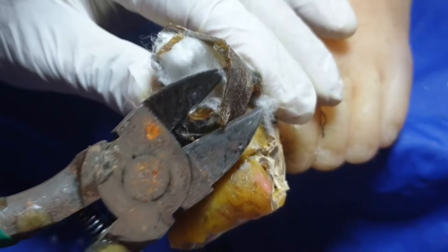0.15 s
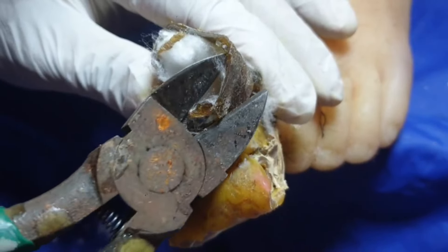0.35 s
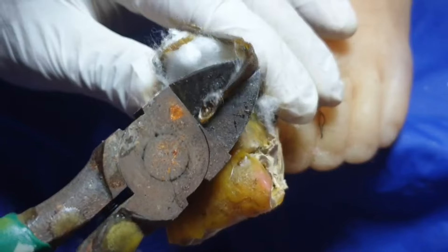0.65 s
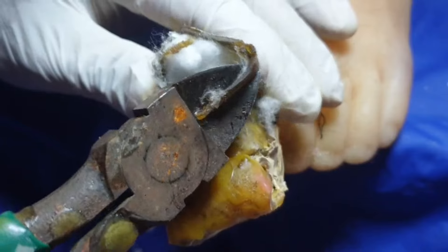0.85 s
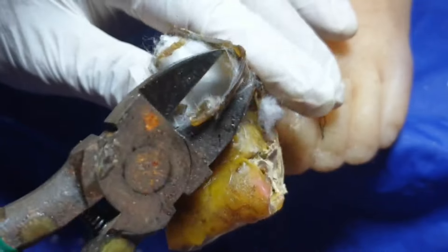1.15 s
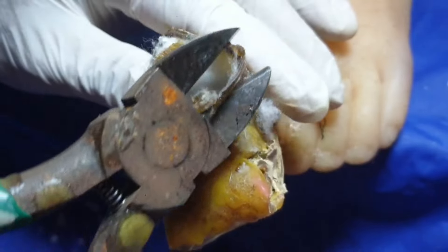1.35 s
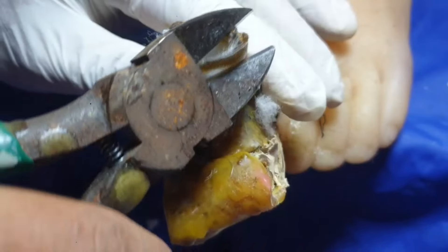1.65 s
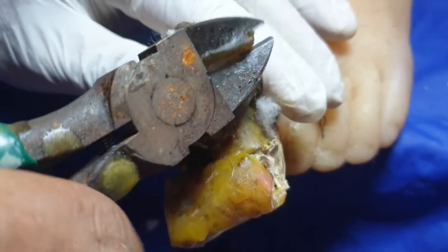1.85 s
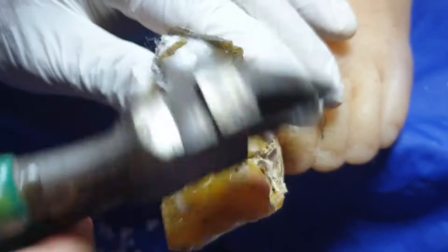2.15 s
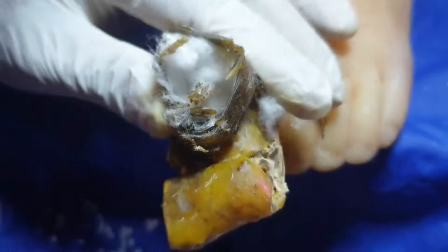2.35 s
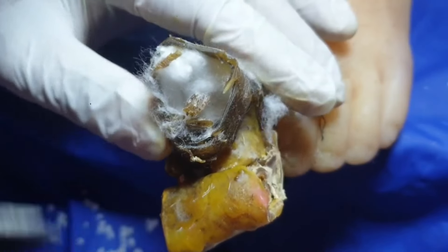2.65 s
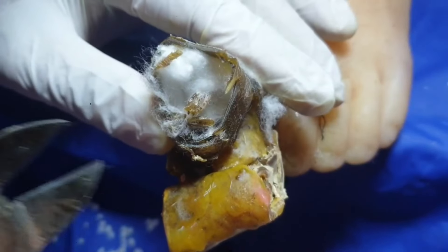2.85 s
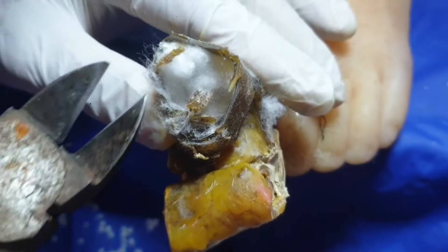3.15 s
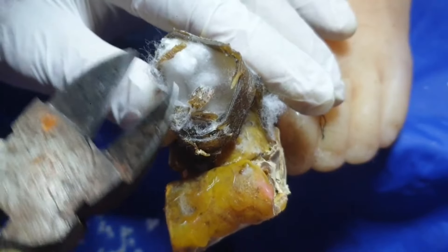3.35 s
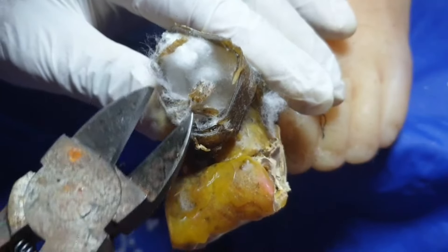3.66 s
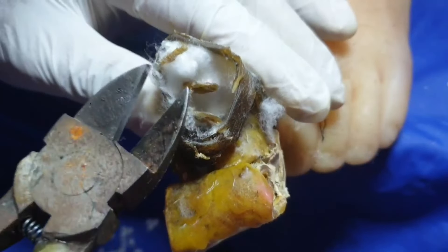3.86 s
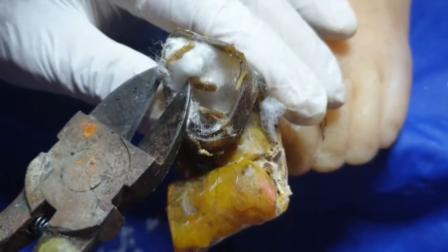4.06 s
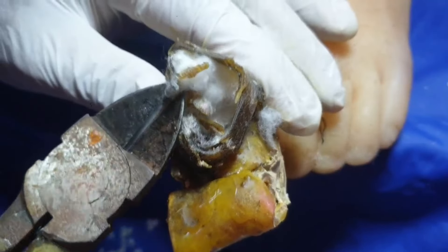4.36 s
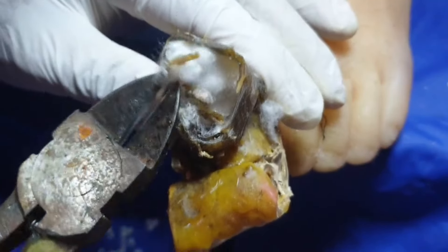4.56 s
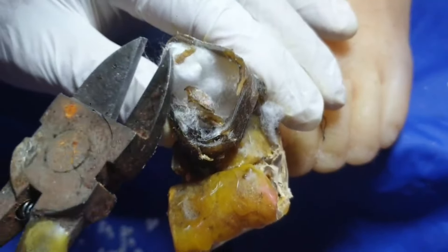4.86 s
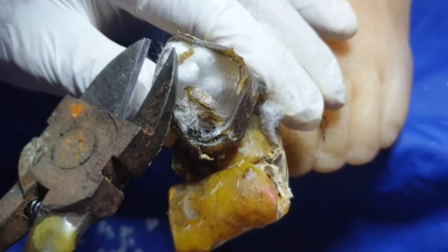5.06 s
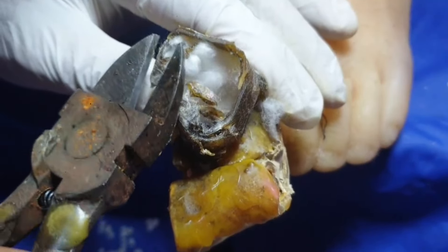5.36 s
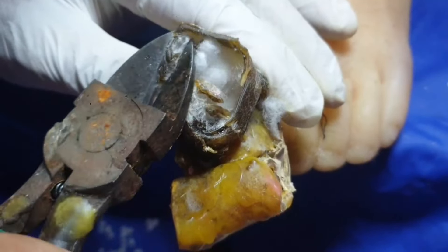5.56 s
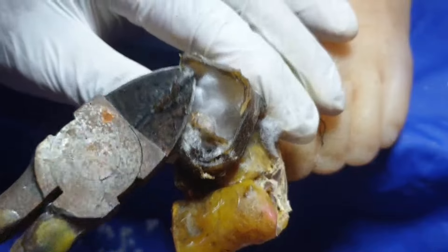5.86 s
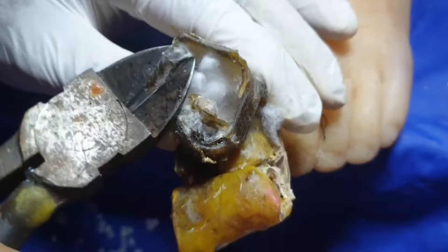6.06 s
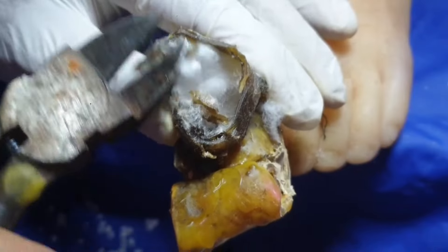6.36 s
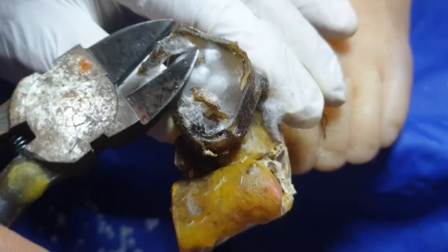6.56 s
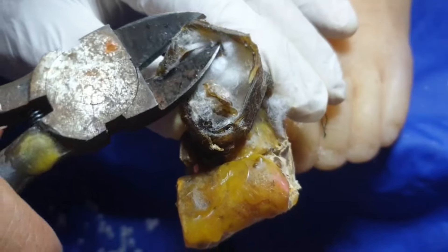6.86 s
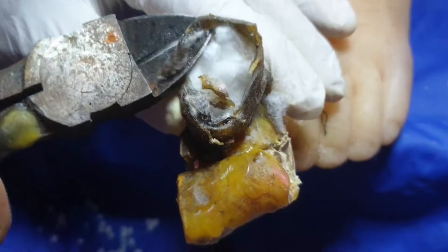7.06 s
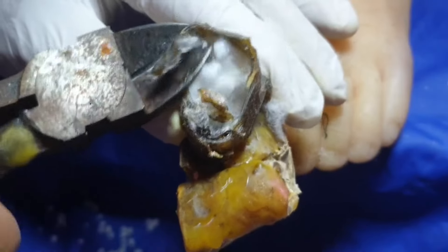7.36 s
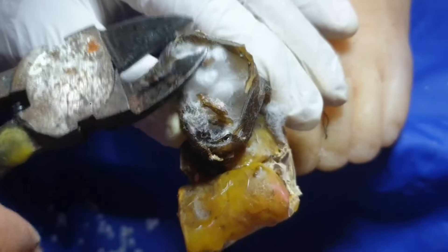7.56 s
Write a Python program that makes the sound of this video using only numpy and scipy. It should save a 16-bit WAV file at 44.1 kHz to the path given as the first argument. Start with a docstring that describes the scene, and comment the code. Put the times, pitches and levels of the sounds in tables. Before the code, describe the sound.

Heavy nippers rasp and squeak faintly, then cut a thick toenail with sharp snaps over a low fan hum and faint hiss.

```python
"""A small hard-walled room, where heavy sprung nippers trim a thick toenail close to the microphone.
A fan hums behind, under faint hiss, and a light draught buffets the two microphone ports.
Steel slips and sticks on steel, so the pivot rasps and squeaks as the jaws close and open.
The nail ticks under load, then parts with a sharp snap that briefly rings both nail and jaws.
Between bites the nippers bump and briefly rattle as they are moved."""
import sys
import numpy as np
from scipy import signal
from scipy.fft import rfft, irfft, next_fast_len
from scipy.io import wavfile
from scipy.ndimage import map_coordinates

SR = 44100
rng = np.random.default_rng(int(sys.argv[2]) if len(sys.argv) > 2 else 0)


def unload_audio(sound):
    """Save the sound as a 16-bit wav file, at the path given as the first command line argument."""
    columns = np.transpose(np.atleast_2d(sound))
    # keep every value between -1 and 1, then stretch to whole-number steps
    steps = np.round(np.clip(columns, -1, 1) * 32767)
    wavfile.write(sys.argv[1], SR, steps.astype(np.int16))


N = 339570
TIME = np.arange(N) / SR


def from_db(db):
    """Decibels to gain."""
    return 10 ** (np.asarray(db) / 20)


def unit_rms(x):
    """Scale to rms 1."""
    return x / np.sqrt(np.mean(x ** 2) + 1e-30)


def panned(pan_db):
    """Left and right gains of mean power 1; every pan is left minus right."""
    return unit_rms(from_db(np.array([[pan_db], [-pan_db]]) / 2))


def eq_curve(points, size):
    """Each column of a frequency table, read at the bins of an FFT of this size."""
    hz, *columns = np.transpose(points)
    log_bins = np.log(np.maximum(np.fft.rfftfreq(size, 1 / SR), 1))
    return np.array([np.interp(log_bins, np.log(hz), column) for column in columns])


def equalise(x, db):
    """Minimum-phase EQ with a gain for each FFT bin: nothing rings ahead of an attack."""
    size = 2 * (db.shape[-1] - 1)
    cepstrum = irfft(np.log(from_db(db)))
    cepstrum[..., 1:size // 2] *= 2
    cepstrum[..., size // 2 + 1:] = 0
    return irfft(rfft(x, size) * np.exp(rfft(cepstrum)))[..., :x.shape[-1]]


def noise(eq):
    """Two unrelated noises of the given colour; rms 1."""
    size = next_fast_len(N, True)
    white = rfft(rng.standard_normal((2, size)))
    return unit_rms(irfft(white * from_db(eq_curve(eq, size)), size)[:, :N])


def drift(rate):
    """Smooth random modulation, changing about rate times a second; rms 1."""
    knots = rng.standard_normal(int(N / SR * rate) + 4)
    return unit_rms(map_coordinates(knots, [TIME * rate], order=3, mode="nearest"))


def resonate(x, hz, width_hz):
    """One band-pass resonance; rms 1."""
    r = np.exp(-np.pi * width_hz / SR)
    poles = [1, -2 * r * np.cos(2 * np.pi * hz / SR), r * r]
    return unit_rms((1 - r * r) * signal.lfilter([1, 0, -1], poles, x))


def ring(t, hz, t60, rise):
    """A damped sine that swells briefly after t = 0."""
    t = np.maximum(t, 0)
    return np.sin(2 * np.pi * hz * t) * (1 - np.exp(-t / rise)) * np.exp(-np.log(1000) * t / t60)


def add(track, s, sound):
    """Mix a sound into the track at s seconds."""
    start = round(s * SR)
    sound, start = sound[:, max(-start, 0):], max(start, 0)
    track[:, start:start + sound.shape[-1]] += sound[:, :N - start]


# colour of the hiss: (frequency [Hz], left gain [dB], right gain [dB])
HISS_EQ = [(2036, -13.5, -5), (3950, 0, -3.5), (5000, -5.5, -1), (7300, -12.5, -4), (8240, -17.5, -14.5),
           (9800, -6.5, -15), (11400, -4, -2), (13300, -4.5, -6.5), (16000, -7.5, -7.5)]


def hiss(level_db=-74.5):
    """A faint, steady bed of bright noise."""
    return from_db(level_db) * noise(HISS_EQ)


# colour of the fan's air: (frequency [Hz], gain [dB])
FAN_EQ = [(20, -43), (35, -13.5), (60, -4), (120, -8), (170, -4), (300, -4), (540, -6), (800, -12.5),
          (1000, -9), (1400, -15), (1800, -16.5), (2750, -25), (3700, -42.5), (6000, -73)]
# its stereo width: (frequency [Hz], side minus mid [dB])
FAN_WIDTH = [(60, -12), (110, -14.5), (200, -14.5), (380, -7.5), (700, -4), (1290, 0.5), (2380, -1),
             (4400, 3), (8120, -2), (15000, -0.5)]
# its lean: (frequency [Hz], pan [dB])
FAN_PAN = [(60, -1), (110, 0), (200, -4), (380, 2), (700, 1.0), (1290, 1), (2380, -1), (4400, -11.5),
           (8120, -1), (15000, 0.5)]


def fan(air_db=-50.5, hum_hz=201.6, hum_db=-54.5, waver_db=1.0, wander_radians=0.18):
    """Dull moving air, nearly mono in the lows, with one slightly wavering blade tone."""
    size = next_fast_len(N, True)
    mid, side = rfft(from_db(air_db) * noise(FAN_EQ), size)
    side = side * from_db(eq_curve(FAN_WIDTH, size))
    polarity = np.array([[1], [-1]])
    balance = from_db(polarity * eq_curve(FAN_PAN, size) / 2)
    air = irfft((mid + polarity * side) * balance, size)[:, :N]
    hum = np.sqrt(2) * np.sin(2 * np.pi * hum_hz * TIME + wander_radians * drift(8))
    return air + from_db(hum_db + waver_db * drift(6.5)) * hum * panned(1.5)


# colour of the wind rumble: (frequency [Hz], gain [dB])
RUMBLE_EQ = [(15, -30.5), (30, -18.5), (55, 3), (85, -1.5), (130, -9.5), (200, -17.5), (400, -30.5),
             (900, -73.5)]
# gusts on the ports: (start [s], hold [s], level [dB], pan [dB])
DRAUGHT_GUSTS = [(0.16, 0.27, -41.5, -6), (0.50, 0.42, -49, -23), (0.80, 0.2, -42, -9),
                 (1.04, 0.24, -50, 4), (1.76, 0.39, -48.5, -1), (2.3, 0.36, -53.5, 3),
                 (2.64, 0.088, -44, -10), (3.27, 0.56, -59, 0.5), (4.63, .15, -47, -6.5),
                 (4.81, 0.22, -42, 4), (5.14, 0.19, -47.5, -9), (5.97, 0.7, -43.5, -13),
                 (7.3, 0.45, -51.5, -16)]
# single eddies: (time [s], level [dB], pitch [Hz], pan [dB])
EDDIES = [(0.90, -31, 90, -10), (1.148, -35, 78.4, 18), (2.195, -30.5, 74.6, -24), (3, -31, 129, -20),
          (4.817, -27.5, 69.6, 32), (5.158, -32.5, 74.4, -16), (5.624, -38.5, 86.5, 22),
          (6.05, -30, 70, -23), (6.325, -27.5, 273, -24), (6.334, -25, 125, -16), (6.354, -27, 74.3, -23),
          (7.606, -32, 78.6, -24)]


def draught(calm_db=-66, attack_s=.04, release_s=.099, lumpy_db=2.0):
    """Gusts build, hold and fade, rumbling on each port; the strongest eddies land as soft thumps."""
    power = from_db(calm_db) ** 2
    for s, hold_s, db, pan_db in DRAUGHT_GUSTS:
        gust = np.exp(np.minimum(TIME - s, 0) / attack_s - np.maximum(TIME - s - hold_s, 0) / release_s)
        power = power + (from_db(db) * panned(pan_db) * gust) ** 2
    wind = noise(RUMBLE_EQ) * np.sqrt(power) * from_db(lumpy_db * drift(25))
    for s, db, hz, pan_db in EDDIES:
        cycles = np.arange(-1, 1, hz / SR)
        thump = np.sin(2 * np.pi * cycles) * np.exp(-(cycles / .5) ** 2)
        add(wind, s - 1 / hz, from_db(db) * thump * panned(pan_db))
    return wind


# colour of the reverb: (frequency [Hz], left gain [dB], right gain [dB])
ROOM_EQ = [(498.6, -1, -3.5), (2000, 6.5, 2), (3400, 3.5, 6), (4210, 3.5, 6.5), (5050, 2, 6.5),
           (6500, -8, 0), (7280, -2.5, 6.5), (8080, 3, 0), (9460, -2, -4.5), (11000, -2.5, -2.5),
           (13370, 4.5, 2.5)]
# its decay by band: (frequency [Hz], t60 [s])
ROOM_DECAY = [(510, 0.55), (2010, 0.29), (4010, 0.82), (7010, .74), (11010, 0.55), (15900, 0.44)]


def room(send, size=2 ** 15, wet_db=-14.5, first_wall_s=0.0033):
    """Hard walls return a diffuse tail that builds after the first wall and lingers most near 4 kHz."""
    t = np.arange(size) / SR
    white, tail = rfft(rng.standard_normal((2, size))), 0
    centres = [hz for hz, _ in ROOM_DECAY]
    for share, (_, t60) in zip(np.eye(len(centres)), ROOM_DECAY):
        band = irfft(white * eq_curve(np.column_stack([centres, share]), size))
        tail = tail + band * np.exp(-np.log(1000) * t / t60)
    build_up = 1 - np.exp(-(t / first_wall_s) ** 2)
    tail = equalise(unit_rms(tail * build_up) / np.sqrt(size), eq_curve(ROOM_EQ, size))
    return from_db(wet_db) * signal.fftconvolve(send, tail, axes=1)[:, :N]


# the blades slide and settle on the nail: (time [s], half length [s], low rasp [dB], high rasp [dB])
BLADE_SLIDES = [(0.116, 0.2, -75, -97), (0.554, 0.053, -76.5, -75), (1.32, 0.14, -75, -79),
                (1.797, 0.063, -77.5, -72), (2.435, 0.12, -78, -73), (2.628, 0.045, -75.5, -73.5),
                (3.29, .04, -82, -81), (4.07, .066, -82, -79), (4.643, 0.017, -67, -65)]
# the hand's move around each bite: (opening time [s], opening half length [s], opening rasp [dB],
# opening squeak [dB], squeeze length [s], final squeeze rasp [dB], catch squeak [dB])
HAND_MOVES = [ (1.115, .026, -66, -71, .17, -67, -68), (2.341, 0.022, -70, -67, .14, -67.5, -54),
              (4.718, .026, -67, -59.5, 0.2, -66.5, -72.5), (6.233, 0.082, -71.5, -71.5, 0.25, -66, -75.5),
              (7.48, 0.041, -70, -65, 0.12, -67.5, -61.5), ]


def rasp_envelopes(squeeze_db_per_s=49, attack_s=.03, low_trim_db=-3):
    """Low and high rasp swell with each squeeze, stop at the snap and return as jaws open or slide."""
    power, slides = np.zeros((2, N)), list(BLADE_SLIDES)
    for (s, *_), (open_s, half_s, open_db, _, squeeze_s, squeeze_db, _) in zip(BITES, HAND_MOVES):
        t = np.arange(-squeeze_s, 0, 1 / SR)
        grip = from_db(squeeze_db + squeeze_db_per_s * t) * np.minimum((t + squeeze_s) / attack_s, 1)
        add(power, s - squeeze_s, (from_db([[low_trim_db], [0]]) * grip) ** 2)
        slides.append((open_s, half_s, open_db + low_trim_db, open_db))
    for s, half_s, *levels_db in slides:
        t = np.arange(-3 * half_s, 3 * half_s, 1 / SR)
        add(power, s + t[0], from_db(levels_db)[:, None] ** 2 * np.exp(-(t / half_s) ** 2))
    return np.sqrt(power)


def steel(slips, modes, shift_db=2.5, shifts_per_s=11):
    """As the contact point moves, the slips feed now one resonance, now another; rms 1."""
    body = 0
    for k, (hz, width_hz, db) in enumerate(modes):
        feed = np.sqrt(width_hz) * from_db(db + shift_db * drift(shifts_per_s))
        body = body + (-1) ** k * feed * resonate(slips, hz, width_hz)
    return unit_rms(body)


# low and high resonances of the nippers: (frequency [Hz], bandwidth [Hz], gain [dB])
LOW_MODES = [(4460, 290, -6), (5500, 100, -5), (6100, 210, -3), (6440, 170, -4.5), (6900, 750, -10.5)]
HIGH_MODES = [(9200, 170, -3), (9500, 150, -4), (9980, 420, -2.5), (10950, 260, -7.5), (11230, 180, -4),
              (12700, 1700, -17.5)]


def pivot_rasp(slips_per_s=2000, judder_db=2.0):
    """Steel slips on steel in tiny uneven steps, which excite the resonances of the nippers."""
    slips = (rng.random(N) < slips_per_s / SR) * from_db(judder_db * drift(56))
    slips = slips * rng.standard_normal((2, N)) + 1e-18
    low, high = rasp_envelopes()
    return low * steel(slips, LOW_MODES) * panned(-6) + high * steel(slips, HIGH_MODES) * panned(10)


# a sliding blade sings: (pitch [Hz], level against its low rasp [dB], pan [dB])
SLIDE_NOTES = [(6490, -2.5, -5.5), (5956, -5, -5), (5460, -8, -3)]
# the three-note squeak as the jaws spring open:
# (pitch [Hz], gain [dB], delay [opening half lengths], length [share of the opening], pan [dB])
OPENING_NOTES = [(11160, -2, -0.15, 0.77, 8), (4500, -3, 0.23, 0.36, 9), (6150, -7.5, .9, .5, -12)]


def squeak_cues(slide_width=.012, pivot_width=.026, detune=.012, catch_lead_s=.08, catch_hz=11320):
    """Steel sticks in each slide, just before each snap and on opening; widths are shares of pitch."""
    cues = [(s, half_s, hz, slide_width, low_db + db, pan_db)
            for s, half_s, low_db, _ in BLADE_SLIDES for hz, db, pan_db in SLIDE_NOTES]
    for (s, *_), (open_s, half_s, _, squeak_db, _, _, catch_db) in zip(BITES, HAND_MOVES):
        cues.append((s - catch_lead_s, .011, catch_hz, pivot_width, catch_db, 14))   # brief, well left
        for hz, db, delay, length, pan_db in OPENING_NOTES:
            pitch = hz * (1 + detune * rng.standard_normal())
            cues.append((open_s + delay * half_s, length * half_s, pitch, pivot_width,
                         squeak_db + db, pan_db))
    return cues


def squeaks(size=2 ** 15, falter_db=4.0, falters_per_s=14):
    """Slips lock onto one resonance, which swells into a thin squeak and falters as the grip shifts."""
    track, t = np.zeros((2, N)), (np.arange(size) - size / 2) / SR
    for s, half_s, hz, width, db, pan_db in squeak_cues():
        slips = rng.standard_normal((2, size))
        tone = resonate(resonate(slips, hz, width * hz), hz, width * hz)
        knots = rng.uniform(-1, 1, size=64)
        falter = from_db(falter_db * np.interp((t - t[0]) * falters_per_s, np.arange(len(knots)), knots))
        swell = np.exp(-.5 * (t / half_s) ** 2)
        add(track, s + t[0], from_db(db) * unit_rms(falter) * tone * swell * panned(pan_db))
    return track


# handling bumps: (time [s], level [dB], knock pitch [Hz], knock level [dB], pan [dB])
HANDLING_BUMPS = [(1.7663, -56.5, 1470, -55, -4), (2.4608, -52.5, 2210, -42, 7),
                  (2.466, -58, 2050, -37, -1), (2.476, -61, 2200, -44, 1)]


def bump_cues(tilt_db_per_octave=-5.5, jaw_trim_db=-11.5):
    """The nippers bump as they are moved: dull cracks with a strong knock."""
    return [(s, db, tilt_db_per_octave, knock_db, hz, db + jaw_trim_db, pan_db)
            for s, db, hz, knock_db, pan_db in HANDLING_BUMPS]


# small bright ticks: (time [s], level [dB])
BRIGHT_TICKS = [(0.783, -73), (1.7006, -72), (2.0006, -64), (2.485, -68), (2.499, -67), (4.348, -58.5),
                (4.3963, -37.5), (5.7504, -63), (5.798, -58), (7.0996, -65.5), (7.1415, -47)]


def tick_cues(tilt_db_per_octave=3, ring_trim_db=-13.5, knock_hz=1610, pan_db=2):
    """Bright ticks that barely ring: the nail under load, and the nippers' brief rattle after a bump."""
    return [(s, db, tilt_db_per_octave, db + ring_trim_db, knock_hz, db + ring_trim_db, pan_db)
            for s, db in BRIGHT_TICKS]


# colour of a crack at each port: (frequency [Hz], left gain [dB], right gain [dB])
CRACK_EQ = [(250, -24, -26), (1100, -27, -26), (1600, -13, -11), (2100, -15, -13.5), (2650, -7, -7),
            (3400, -14, -13), (4300, -7, -8), (5100, -18, -17), (6300, -5, 0), (7100, -9, -3),
            (8100, -21, -26), (9400, -2, -12), (11200, 3, -6), (13200, -12, -18), (15500, -24, -30)]
# ring of the two jaws: (pitch [Hz], t60 [s], gain [dB], pan [dB])
JAW_MODES = [(4000, .016, 0, -16), (4270, .011, -6, 3)]
# the hero hits, where the nail snaps: (time [s], crack level [dB], tilt [dB/octave],
# knock level [dB], knock pitch [Hz], jaw ring [dB], pan [dB])
BITES = [ (0.8031, -38, -9, -23, 1577, -24, 2), (2.0293, -48, -4, -33, 1460, -56, 6),
         (4.3985, -19.6, 2.1, -25, 1620, -16.8, 0), (5.8290, -24, -0.6, -22, 1600, -14.5, 0),
         (7.1425, -43, -6, -38.5, 1540, -30.5, 4), ]


def cracks(cues, size=2048, right_lag_s=0.000094, overtone_ratio=1.68, jaw_send_db=-23.0):
    """One sharp break, a burst of splinters, a knock and ringing jaws; returns close sound and send."""
    close, send = np.zeros((2, N)), np.zeros((1, N))
    t = np.arange(size) / SR - np.array([[0], [right_lag_s]])
    bin_hz = np.fft.rfftfreq(size, 1 / SR)
    octaves = np.log2(np.maximum(bin_hz, 1600) / 8000)   # the tilt levels off below 1600 Hz
    port_eq = eq_curve(CRACK_EQ, size)
    mean_eq = 10 * np.log10(np.mean(from_db(port_eq) ** 2, axis=0))
    jaw_peak = unit_rms(1 / (1 + ((bin_hz - 4040) / 210) ** 2))
    splinter_envelope = np.maximum(t, 0) ** .5 * np.exp(-t / .0014)
    # the left port faces the cut and gets more of the first break
    first_break = np.diff(t >= 0, prepend=False) * np.array([[.95], [.5]])
    level_samples = .01 * SR   # a crack's level is its rms over 10 ms
    for s, crack_db, tilt, knock_db, knock_hz, jaw_db, pan_db in cues:
        splinters = rng.standard_normal((2, size)) * splinter_envelope
        force = first_break + splinters / np.linalg.norm(splinters, axis=1, keepdims=True)
        force /= np.linalg.norm(force, axis=1, keepdims=True)
        gain = from_db(crack_db) * np.sqrt(level_samples / size)
        crack = gain * unit_rms(equalise(force, port_eq + tilt * octaves))
        fundamental = ring(t, knock_hz, t60=.023, rise=.0012)
        overtone = from_db(-12) * ring(t, overtone_ratio * knock_hz, t60=.015, rise=.00067)
        knock = from_db(knock_db) * (fundamental + overtone) * panned(6.5)
        jaws = sum(from_db(jaw_db + db) * ring(t, hz, t60, rise=.001) * panned(lean_db)
                   for hz, t60, db, lean_db in JAW_MODES)
        add(close, s, (crack + knock + jaws) * panned(pan_db))
        # the room hears all directions: splinters blend to a smooth spectrum, jaw tones to one peak
        blend = from_db(crack_db) * unit_rms(from_db(mean_eq + tilt * octaves))
        energy = (blend ** 2 + (from_db(jaw_db + jaw_send_db) * jaw_peak) ** 2) * level_samples
        add(send, s, equalise(signal.unit_impulse(size)[None], 10 * np.log10(energy)))
    return close, send


def scene(friction_send_db=-2.5):
    """Close nippers and their reverb over a bed of fan, draught and hiss."""
    hits, hit_send = cracks(BITES + tick_cues() + bump_cues())
    friction = pivot_rasp() + squeaks()
    reverb = room(hit_send + from_db(friction_send_db) * friction.mean(axis=0))
    return hits + friction + reverb + fan() + draught() + hiss()


def record(dry):
    """A 3 ms fade-in and a steep high cut at 15.8 kHz."""
    faded = dry * np.minimum(TIME / .003, 1)
    high_cut = signal.ellip(10, .1, 80, 15800, fs=SR, output="sos")
    return signal.sosfilt(high_cut, faded)


dry = scene()
out = record(dry)
unload_audio(out)
```